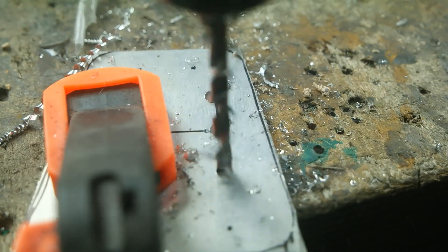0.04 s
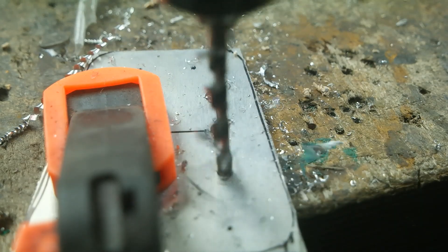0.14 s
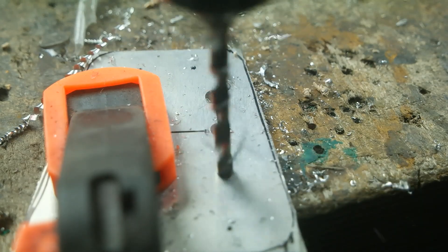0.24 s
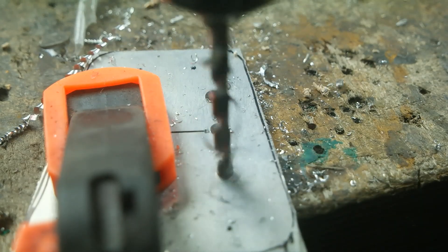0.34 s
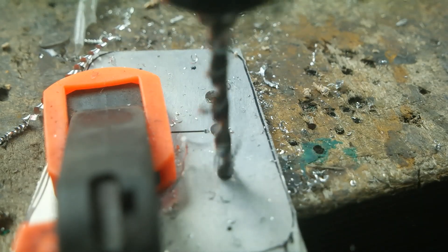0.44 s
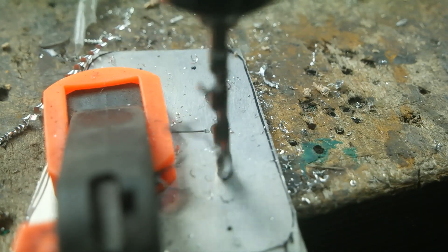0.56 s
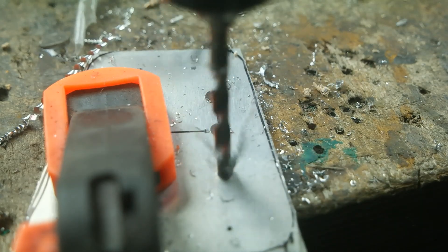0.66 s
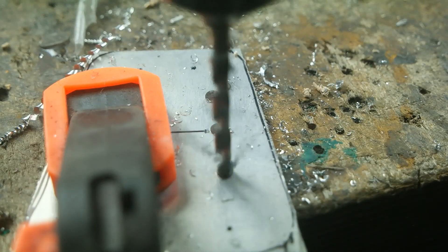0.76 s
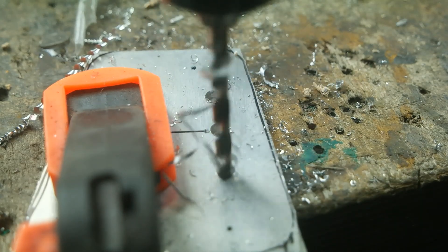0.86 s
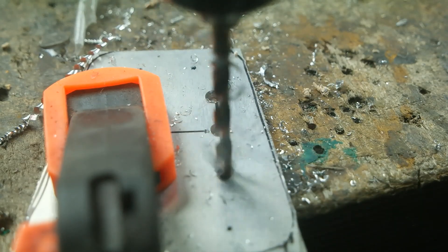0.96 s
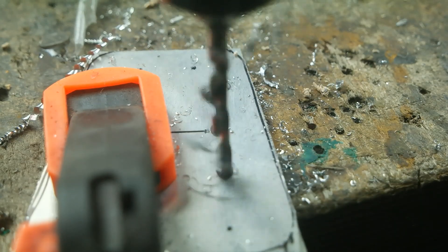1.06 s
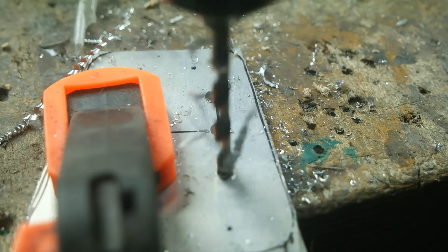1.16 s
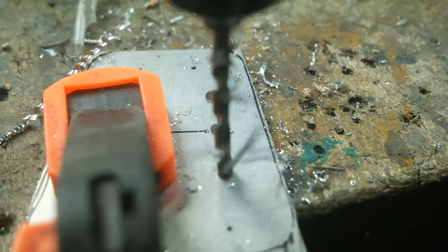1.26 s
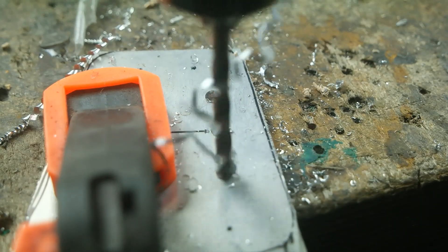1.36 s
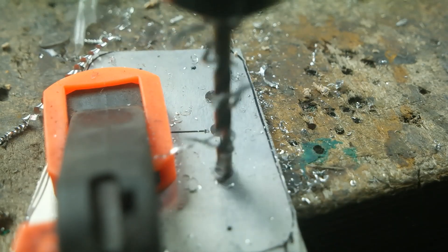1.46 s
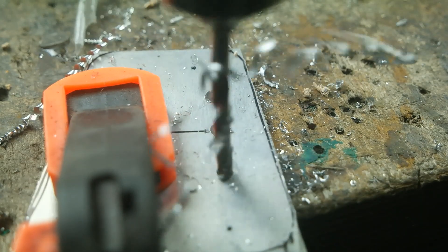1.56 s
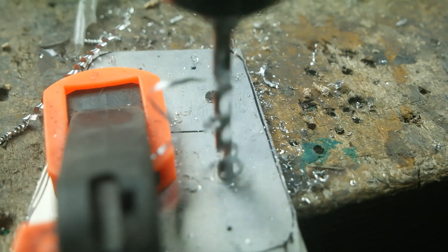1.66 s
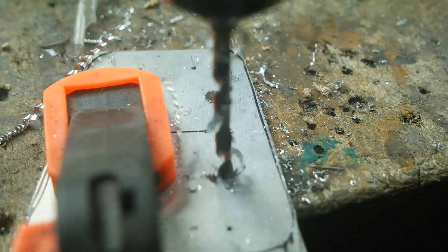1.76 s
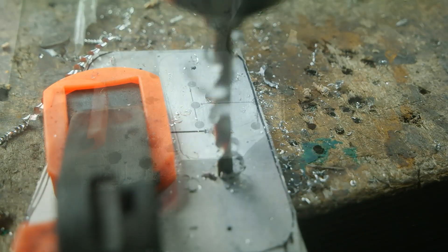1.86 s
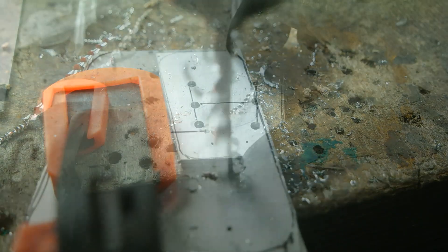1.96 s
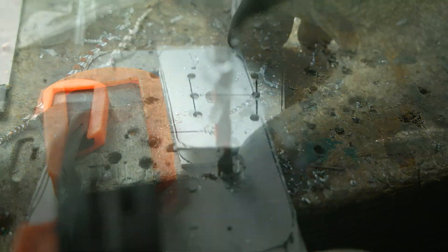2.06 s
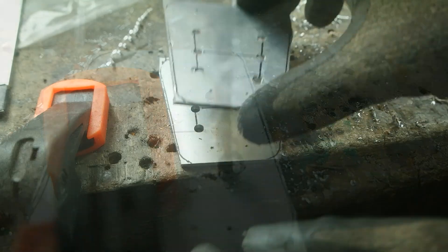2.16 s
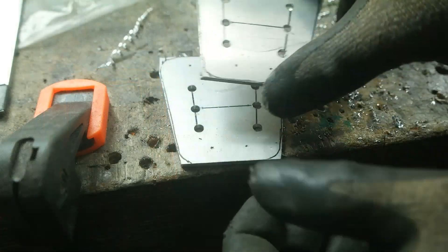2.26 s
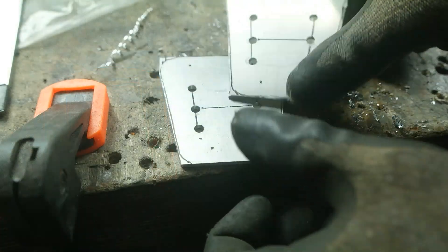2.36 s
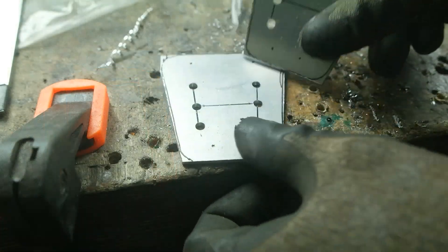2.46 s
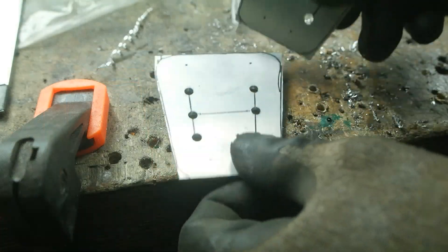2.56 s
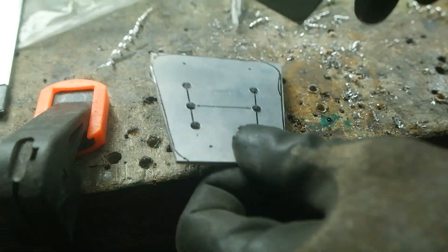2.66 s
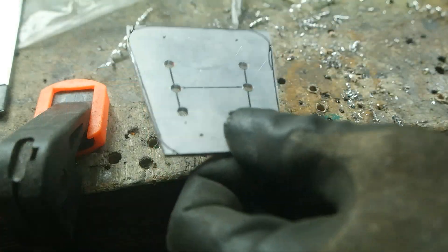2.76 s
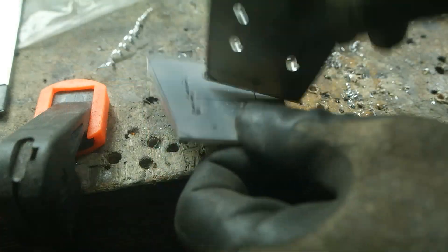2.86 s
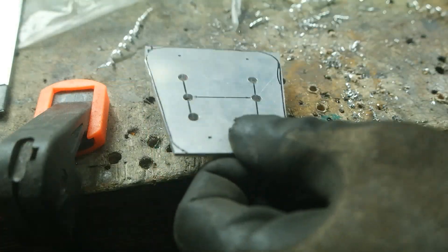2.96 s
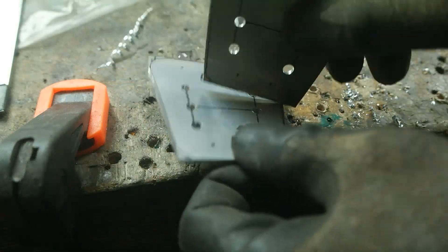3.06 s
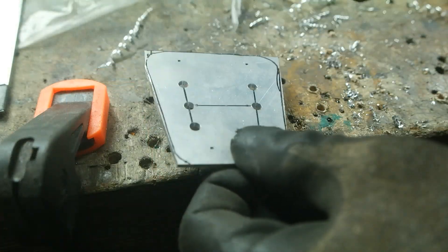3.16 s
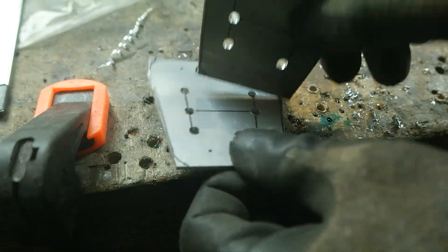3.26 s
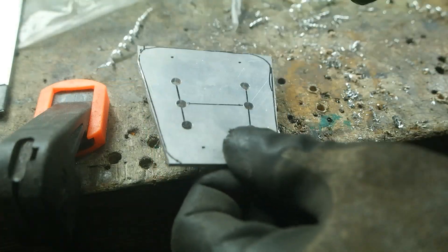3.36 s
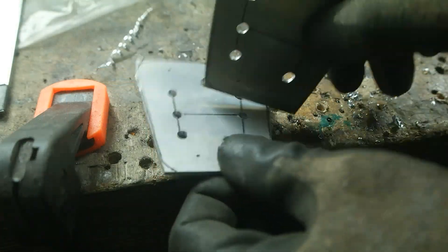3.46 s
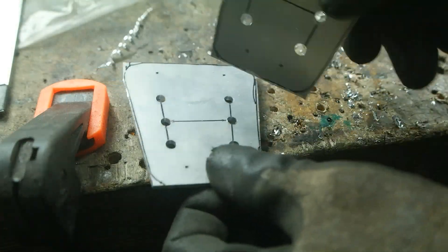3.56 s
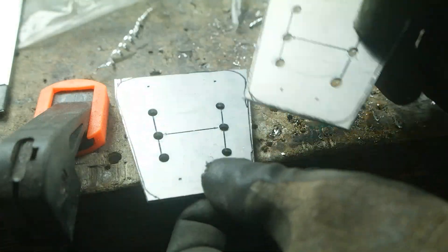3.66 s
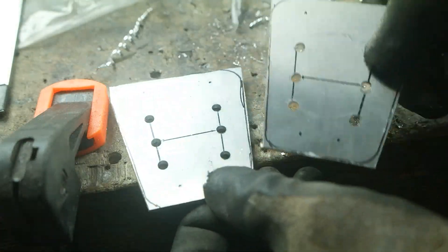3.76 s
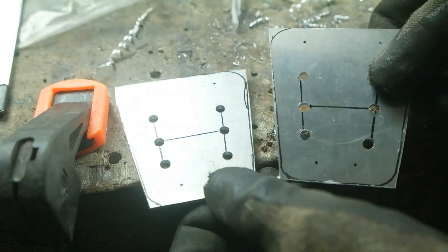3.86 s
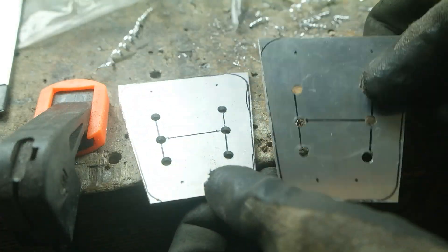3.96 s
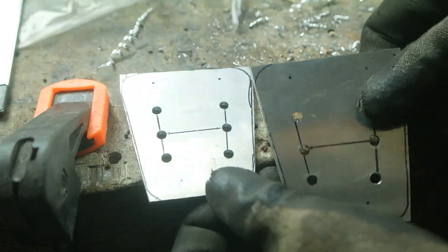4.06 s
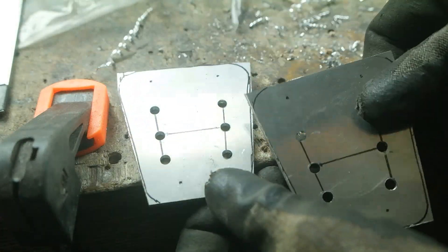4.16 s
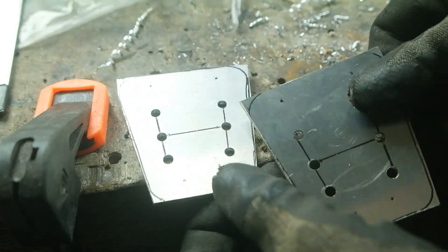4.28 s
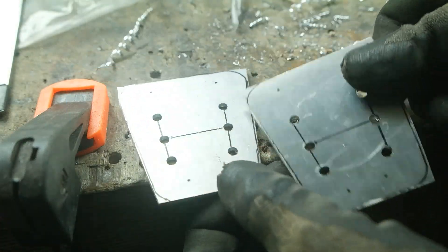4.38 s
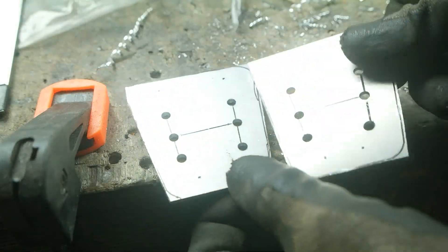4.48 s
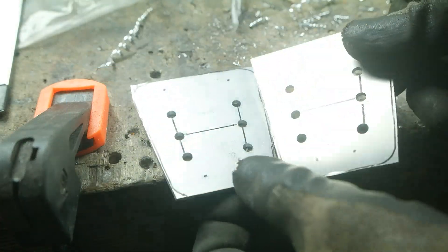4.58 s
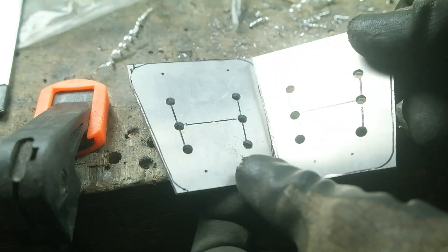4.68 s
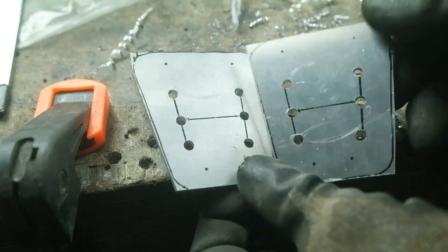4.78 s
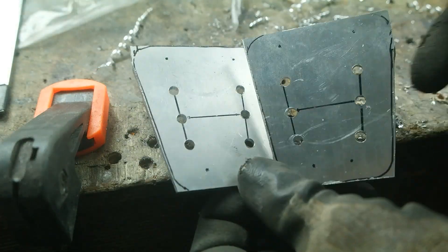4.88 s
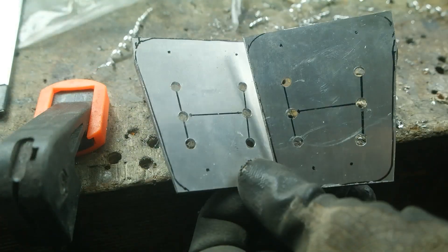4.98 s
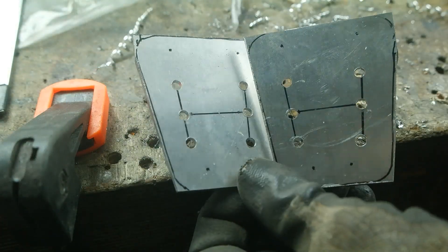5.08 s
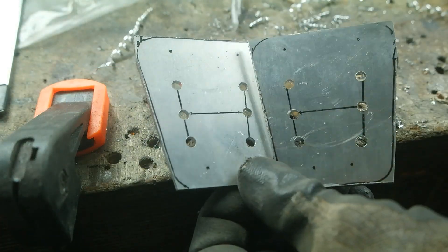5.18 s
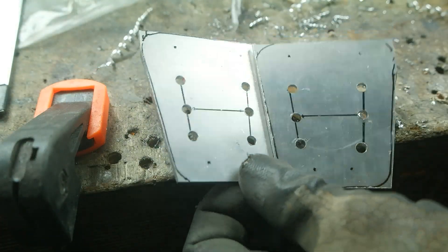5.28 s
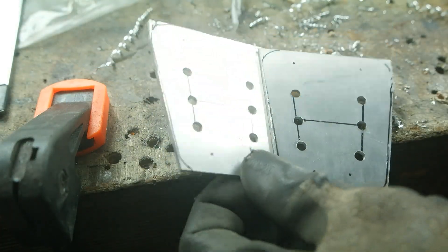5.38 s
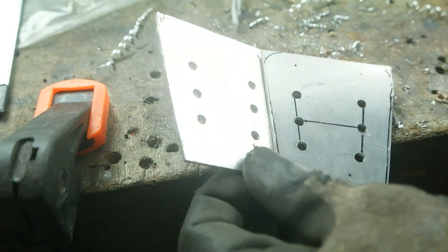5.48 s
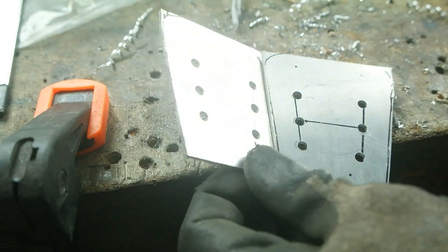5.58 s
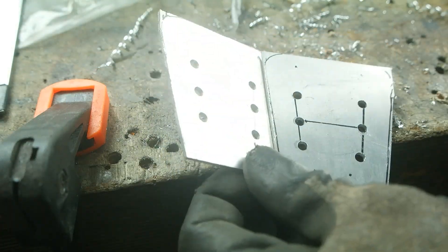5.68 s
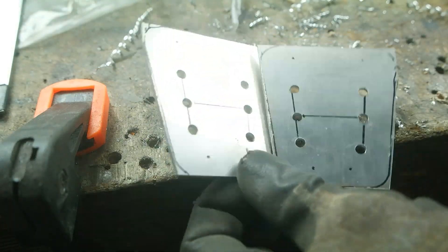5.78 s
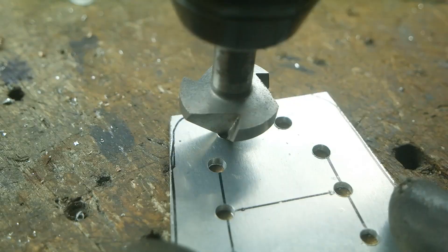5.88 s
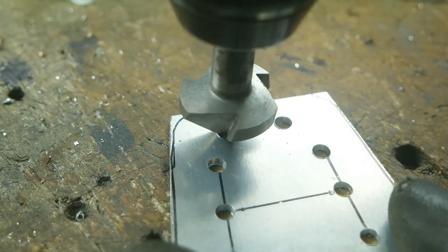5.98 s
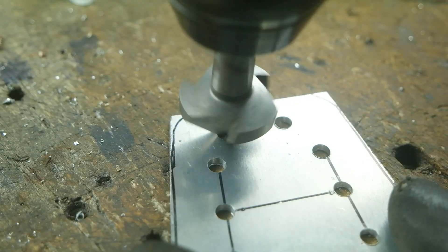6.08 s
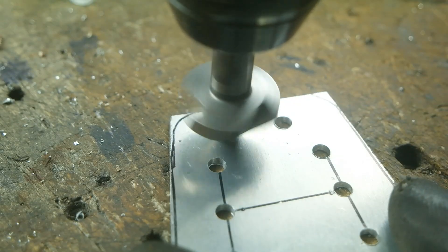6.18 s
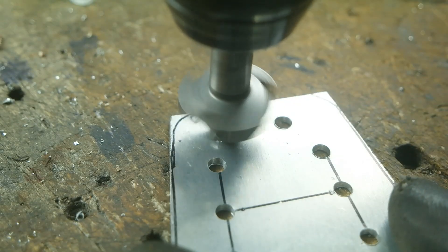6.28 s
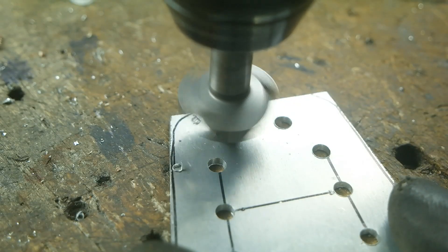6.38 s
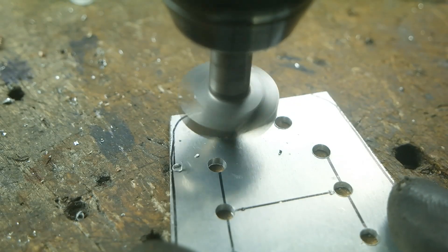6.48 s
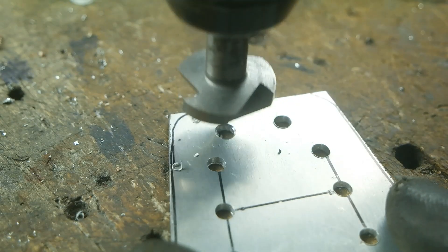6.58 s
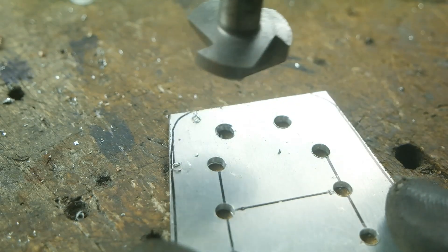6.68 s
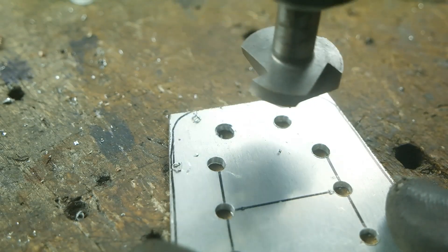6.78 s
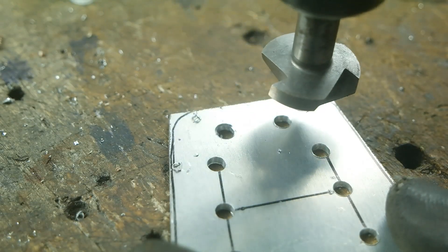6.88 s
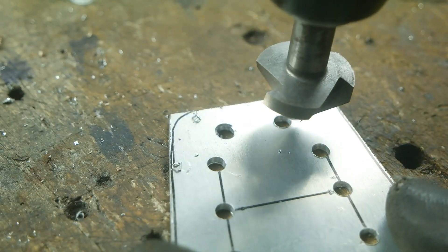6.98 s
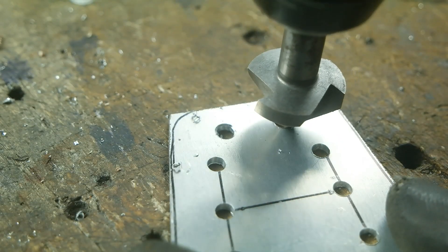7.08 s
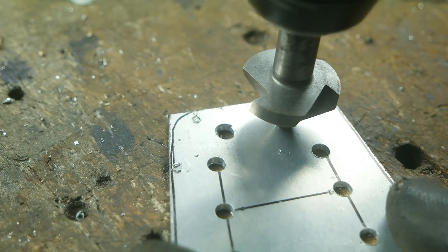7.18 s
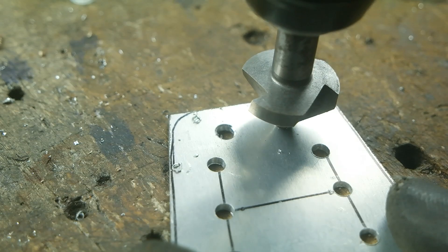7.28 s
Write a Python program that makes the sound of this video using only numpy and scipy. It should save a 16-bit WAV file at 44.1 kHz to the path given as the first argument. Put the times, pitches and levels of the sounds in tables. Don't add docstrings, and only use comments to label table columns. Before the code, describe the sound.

Drill whine and throbbing metallic hiss fill the first two seconds, then cut off. Thin plates rattle, ping and scrape close to the microphone, the loudest knocks distorting. Quiet handling and low room noise follow. Lastly, a countersink drill ticks against metal, is triggered with a snap, surges in two quick overlapping rises, stops with sharp clicks, and ends in a short fading room echo, light taps and a low hum.

```python
import sys
import numpy as np
from scipy import signal
from scipy.fft import rfft, irfft, next_fast_len
from scipy.io import wavfile
from scipy.ndimage import uniform_filter1d

SR = 44100
rng = np.random.default_rng(int(sys.argv[2]) if len(sys.argv) > 2 else 0)


def waveform_to_disk(signal):
    frames = np.transpose(np.atleast_2d(signal))
    scaled = np.clip(frames, -1, 1) * 32767
    samples = np.round(scaled).astype(np.int16)
    wavfile.write(sys.argv[1], SR, samples)


def attenuation_scalar(level_db):
    decades = np.asarray(level_db, float) / 20
    return 10 ** decades


N = 323694
TIME = np.arange(N) / SR

# pitch in Hz, width in Hz while rubbed, level in dB, change when gripped in dB.
PLATE = [(2050, 47, -26, 0.5), (2945, 74, 19.5, -1), (3810, 78, -7.5, -4), (4200, 90, -19.5, 1.5),
         (4960, 130, -10, 1.5), (5450, 110, -5.5, -4), (7460, 90, -17, 3), (7620, 150, -13, 5),
         (6990, 60, -19.5, 4), (10050, 150, -22.5, 6), (10886, 80, -9, -6), (11930, 110, -12, -3),
         (12000, 120, -14.5, -3.5), (14300, 230, -12, 0.5)]
RUB_RISE = 8100
WHINE_RISE = 920


def evened(x):
    return x / np.sqrt(np.mean(x ** 2) + 1e-20)


def read(points, hz):
    f, value = np.transpose(points)
    return np.interp(np.log(hz + 1), np.log(f + 1), value)


def curve(rows, order):
    rows = np.array(rows)
    return np.interp(TIME, rows[:, 0], rows[:, order])


def level(rows, order):
    inside = (TIME >= rows[0][0]) & (TIME <= rows[-1][0])
    return attenuation_scalar(curve(rows, order=order)) * uniform_filter1d(inside * 1., size=100)


def swells(rows, rise):
    start, hold, db, fall = np.array(rows, float).T[:4, :, None]
    rise = np.reshape(rise, (-1, 1))
    early = np.maximum(start - TIME, 0)
    late = np.maximum(TIME - start - hold, 0)
    return attenuation_scalar(np.max(db - rise * early - abs(fall) * late, axis=0))


def during(spans):
    return sum((TIME > s) & (TIME < s + length) for s, length in spans) * 1.


def add(mix, s, sound):
    part = mix[round(s * SR):][:len(sound)]
    part += sound[:len(part)]


def resonate(x, hz, width):
    turn = np.exp(2j * np.pi * np.cumsum(hz * np.ones(len(x))) / SR)
    r = np.exp(-np.pi * width / SR)
    return 2 * (turn * signal.lfilter([1 - r], [1, -r], x / turn + 1e-18)).real


def noise(colour, patchy_db, lo_hz, hi_hz, apart):
    # pitch in Hz, likeness of left and right from 0 to 1.
    likeness = [(60, 0.32), (180, 0.95), (550, 0.88), (1650, 0.84), (4970, 0.39), (15000, 0.17)]
    frames, hz = N // 256 + 5, np.fft.rfftfreq(1024, 1 / SR)
    a, b, c, d, patches = rng.standard_normal((frames, 513, 5)).T
    patches = evened(uniform_filter1d(uniform_filter1d(patches, size=10, axis=0), size=5, axis=1))
    same = np.clip(1 - apart * (1 - read(likeness, hz)), -1, 1)[:, None]
    left = a + 1j * b
    right = same * left + np.sqrt(1 - same ** 2) * (c + 1j * d)
    shape = attenuation_scalar(read(colour, hz))
    z = np.array([left, right]) * shape[:, None] * attenuation_scalar(patchy_db * patches)
    share = np.sum(shape[(hz > lo_hz) & (hz < hi_hz)] ** 2) / np.sum(shape ** 2)
    return evened(signal.istft(z, nperseg=1024, noverlap=768)[1][:, :N]) / np.sqrt(share)


def whine(hz, orders, dbs, waver_hz, flutter_db, pace=150, shell=((1, 0), (2, 0))):
    out, knots = np.zeros(N), np.arange(1500) / max(pace, 5)
    for k, db in zip(orders, dbs):
        waver, flutter = (np.interp(TIME, knots, v) for v in rng.standard_normal((2, 1500)))
        gain = attenuation_scalar(db + flutter_db * flutter + read(shell, k * hz)) * np.sqrt(2)
        out += gain * np.cos(2 * np.pi * np.cumsum(k * hz + waver_hz * waver) / SR)
    return out


def spread(x, wide_db):
    # pitch in Hz, side against middle in dB.
    side_colour = [(60, -10), (180, -20.5), (550, -12.5), (1650, -20.5), (3300, -8), (5500, -2.5),
                   (15000, -3)]
    hz = np.fft.rfftfreq(1024, 1 / SR)
    taps = rng.standard_normal(1024) * np.exp(-np.arange(1024) / 400.0)
    side = irfft(rfft(taps / np.linalg.norm(taps)) * attenuation_scalar(read(side_colour, hz) + wide_db))[:600]
    return x + np.array([[1], [-1]]) * signal.oaconvolve(x, side)[:N]


def panned(x, left_db):
    return x * attenuation_scalar([[left_db / 2], [-left_db / 2]])


def dulled(x, from_s, above_hz, fall_db_per_s):
    low = signal.lfilter(*signal.butter(2, above_hz, fs=SR), x)
    return low + (x - low) * attenuation_scalar(-fall_db_per_s * np.maximum(TIME - from_s, 0))


def boring():
    # time in seconds, turns of the spindle gear in Hz.
    speed = [(0, 53.9), (.1, 53.75), (.7, 53.78), (.9, 53.55), (1.1, 53.1), (1.3, 52.4), (1.5, 51.7),
             (1.7, 50.6), (2.04, 47)]
    # time in seconds, cutting hiss in dB.
    push = [(0, -21), (1.74, -21), (1.83, -26), (1.87, -44), (2.05, -55)]
    gear_orders = [12, 16, 23.198, 24, 35.23, 36, 40, 42, 45, 47.2, 50.35, 54.7, 59.3, 64, 67, 72, 80, 90,
                   98.2, 103]
    gear_dbs = [-39, -52, -39, -37.5, -36, -39, -45, -46.5, -36, -38.5, -51, -49, -39.5, -58.5, -54, -36,
                -41.5, -37, -52.5, -50]
    shaft_dbs = [-48, -49, -43, -48]
    # pitch in Hz, level in dB per Hz.
    cut_colour = [(530, -20.5), (900, -6.5), (1150, -10.5), (1260, -0.5), (1620, -6), (1900, 2.5),
                  (2270, -2), (2730, 3), (4050, -3.5), (5890, -3.5), (10100, -10.5), (15100, -8),
                  (16000, -33)]
    housing_colour = [(35, -78.5), (60, -57), (233, 10), (442, 3.5), (574, 8.5), (699, 6.5), (823, 4.5),
                      (3000, -18), (3900, -26), (6600, -120)]
    stop_s, chuck_ratio = 2.045, .2673

    hz = curve(speed, order=1)
    turns = np.cumsum(hz) / SR
    throb = 1 + .1 * np.cos(2 * np.pi * 3 * turns) + .08 * np.cos(2 * np.pi * 4 * turns)
    hiss = noise(cut_colour, 0.27, 1500, 13000, apart=0.86) * throb
    hiss = signal.lfilter(*signal.butter(1, 150, "high", fs=SR), hiss)
    gears = whine(hz, gear_orders, gear_dbs, waver_hz=1.2, flutter_db=1.2, pace=40)
    cut = hiss + attenuation_scalar(21.0) * spread(gears, wide_db=3.0)
    wobble = .4 * np.cos(2 * np.pi * (chuck_ratio * turns - .18))
    cut = cut + wobble * np.array([resonate(v, 1270, 120) + resonate(v, 1950, 270) for v in cut])
    chatter = .3 * np.cos(2 * np.pi * 3 * chuck_ratio * turns)
    cut = cut + chatter * np.array([resonate(v, 2750, 830) for v in cut])

    shaft = whine(hz, range(3, 7), shaft_dbs, waver_hz=.8, flutter_db=2., pace=20)
    housing = attenuation_scalar(-7.0) * noise(housing_colour, 0.66, 120, 1100, apart=0.53) + attenuation_scalar(28) * shaft
    effort_db = curve(push, order=1)
    housing_db = -28.5 + 0.29 * (effort_db - push[0][1])
    both = attenuation_scalar(effort_db) * dulled(cut, 1.7, 8560, 37) + attenuation_scalar(housing_db) * housing
    return both * np.clip((stop_s - TIME) / 0.0039, 0, 1)


def knocks():
    # time in seconds, peak in dB, middle modes in dB, upper modes in dB.
    knock_list = [(2.425, -23.5, -1.5, -9.5), (2.4228, -10.5, 2, -6.5), (2.4265, -13.5, 1, 5.5),
                  (2.445, -15, 0.5, 2), (2.448, -14, 0, 4), (2.4648, -11.5, -8, -9.5),
                  (2.481, -16, -9.5, -13), (2.4936, -17, 0, -1), (2.497, -11, -2, -4),
                  (2.5083, -15, -6.5, -4.5), (2.523, -17.5, -7.5, -1.5), (2.536, -24, -9.5, -7),
                  (2.6625, -10.5, 12.5, -4), (2.6664, -14.5, 12.5, -0.5), (2.9175, 11, -15.5, -16.5),
                  (2.924, -3.5, -2, -2.5), (2.9272, -9.5, 0, 2), (2.933, -17, -12.5, -11),
                  (3.0971, 8.5, -19.5, -16), (3.1, -4, -2.5, 1), (3.1041, -10, -4, -2),
                  (3.107, -16.5, 4.5, 3), (3.291, 7, -14, -26), (3.2969, -2, -6, -3.5),
                  (3.2998, -12.5, 2, 0), (3.4875, 5, -6.5, -16), (3.4904, -4.5, 1, 4.5),
                  (3.4953, -16, -2, 4), (4.05, -53, 9, 6.5), (4.062, -53, 8.5, -1), (4.4326, -50, -14, 4),
                  (4.4594, -59, 3.5, 0.5), (4.492, -35.5, -8, -13), (4.559, -36.5, -10, -5),
                  (4.629, -45.5, 5, 0), (4.6655, -35.5, -8, -16), (4.699, -41, -11.5, -10),
                  (4.8223, -51, -4, -8)]
    # start in seconds, length in seconds.
    pinches = [(2.64, .1), (2.932, .1), (3.107, .1), (3.292, .6)]
    contact_s, ring_contact_s = 0.0024, .0004
    contact = np.zeros((5, N))
    t = np.arange(2000) / SR
    for (s, peak_db, mid_db, top_db), shake in zip(knock_list, rng.standard_normal((len(knock_list), 2000))):
        push = np.exp(-t / contact_s) * shake
        push[0] = np.clip(-5 - .45 * peak_db, 1, 8)
        push /= np.linalg.norm(push)
        thud_db = -21 - .5 * peak_db
        for row, db in enumerate((0, mid_db, top_db, thud_db)):
            add(contact[row], s, attenuation_scalar(peak_db + db) * push)
        blow = t * np.exp(-t / ring_contact_s) * np.sin(2 * np.pi * PLATE[1][0] * t)
        add(contact[4], s, attenuation_scalar(peak_db - 16.0) * blow / np.linalg.norm(blow))

    out = np.zeros(N)
    pinched = uniform_filter1d(during(pinches), size=400)
    for hz, _, db, _ in PLATE:
        group = int(hz > 3500) + int(hz > 6800)
        free = 12 + .012 * hz
        struck = resonate(contact[group or 4], hz, free * (1 + min(group, 1)))
        if not group:
            short = resonate(contact[4], hz, 2.5 * free) / 2.5
            struck += pinched * (short - struck)
        out += attenuation_scalar(.5 * db + 29.5) * struck

    s, peak_db = np.transpose(knock_list)[:2]
    whole, middle, upper, thud, _ = contact * attenuation_scalar(.3 * np.maximum(np.interp(TIME, s, peak_db), -22))
    out += attenuation_scalar(22.0) * resonate(resonate(whole, 2700, 1300), 2450, 1300)
    out += attenuation_scalar(15.0) * resonate(middle, 4800, 1500)
    out += attenuation_scalar(-11.5) * resonate(upper, 11000, 8000)
    return out + attenuation_scalar(12.0) * resonate(resonate(thud, 780, 1200), 780, 1200)


def rubbing():
    # start in seconds, hold in seconds, main ring in dB, upper modes in dB, fall in dB per second.
    strokes = [(2.216, .02, -91, -75, 148.5), (2.312, .03, -77, -69, 98), (2.346, .045, -67, -60.5, 98),
               (2.4, 0.017, -57.5, -44.5, 687.5), (2.445, 0.0068, -26, -24, 500),
               (2.46, 0.0063, -28, -22, 405.5), (2.475, 0.011, -27.5, -23.5, 300),
               (2.49, 0.018, -19.5, -16.5, 324), (2.546, 0.061, -52, -41, 83.5),
               (2.693, 0.0089, -45, -36.5, 124.5), (2.946, 0.13, -23.5, -31.5, 296),
               (3.112, 0.15, -27, -32.5, 302), (3.319, 0.14, -29, -34, 196), (3.501, 0.13, -26.5, -31, 101),
               (4.037, 0.017, -59, -56.5, 246), (4.099, 0.52, -77, -62.5, 79.5),
               (4.648, .05, -78, -63, 103), (4.74, 0.08, -75.5, -62.5, 121.5)]
    # start in seconds, length in seconds.
    grips = [(2.428, 0.26), (3.298, 0.76)]
    # pitch in Hz, width in Hz, level in dB.
    grit_bands = [(1184, 1100, -9.5), (2420, 1300, 0.5), (4582, 1800, 3), (8300, 1700, 0.5),
                  (9600, 2200, -4), (11600, 2600, -5.5), (14400, 1700, -5.5)]
    # start in seconds, hold in seconds, level in dB, fall in dB per second.
    squeaks = [(4.31, 0.038, -61.5, 197), (4.495, 0.052, -56, 698.5), (4.612, 0.02, -62, 701),
               (1.7, 0.0607, -67.5, 298)]
    scrapes = [(2.446, .012, -26, 300), (2.47, .02, -31.5, 294), (2.497, .03, -33.5, 200),
               (2.53, .008, -33, 148)]
    burrs_per_s = 3000
    slide, slide_db, slide_pace = .012, 3, 14

    grain_db = 5.5 * np.minimum(rng.exponential(1, N), 4)
    grit = attenuation_scalar(grain_db) * rng.standard_normal(N)
    ring, knots = np.zeros((2, N)), np.arange(200) / slide_pace
    grip = uniform_filter1d(during(grips) * .9, size=1500)
    for (hz, width, db, gripped_db), slides in zip(PLATE, rng.standard_normal((len(PLATE), 2, 200))):
        high = int(hz > 3500)
        free = 12 + .012 * hz
        width = max(width, 2 * free) if high else free
        shift, mute = (high * np.interp(TIME, knots, v) for v in slides)
        hz = hz * (1 + slide * shift)
        rung = resonate(resonate(grit, hz, width), hz, 6 * width)
        ring[high] += attenuation_scalar(db + gripped_db * grip + slide_db * mute) * rung

    damped = evened(resonate(resonate(grit, 2990, 300), 3500, 1600))
    main = (1 - grip) * evened(ring[0]) + 0.66 * grip * damped
    main += 0.16 * evened(resonate(resonate(grit[::-1], 2110, 450), 2110, 600))
    direct = sum(attenuation_scalar(db) * resonate(resonate(grit, f, w), f, w) for f, w, db in grit_bands)
    upper = evened(ring[1]) + evened(direct)
    main_gain = swells([row[:3] + row[4:] for row in strokes], RUB_RISE)
    upper_gain = swells([(a, b, db, fall) for a, b, _, db, fall in strokes], RUB_RISE)
    rub = main_gain * evened(main) + attenuation_scalar(-0.5) * upper_gain * evened(upper)

    rub = rub + swells(squeaks, 500) * evened(resonate(resonate(grit, 5540, 170), 5540, 400))
    burrs = np.tanh(grit / 4) * (rng.random(N) < burrs_per_s / SR)
    catch = resonate(resonate(burrs, 950, 1100), 950, 1500) + .1 * resonate(burrs, 5000, 3000)
    rub = rub + swells(scrapes, RUB_RISE) * evened(catch)
    return signal.sosfilt(signal.ellip(8, .5, 60, 14900, fs=SR, output="sos"), rub)


def plates():
    # start in seconds, hold in seconds, level in dB, fall in dB per second.
    presses = [(2.43, 0.063, -43, 300), (2.5, 0.21, -41, 68), (2.93, 0.6, -41, 57), (3.3, 0.31, -38.5, 68),
               (4.1, 0.27, -66, 42), (4.495, 0.013, -57.5, 303.5), (4.39, .015, -60, 300),
               (4.675, 0.024, -51, 198.5), (4.75, .1, -75.5, 42)]
    # pitch in Hz, level in dB per Hz.
    bench_colour = [(24, -70.5), (40, -54), (246, -3.5), (390, 0.5), (629, 0), (762, -7), (1440, -37),
                    (1800, -13), (2340, -40.5), (3960, -120)]
    steel = knocks() + rubbing()
    near = spread(steel, wide_db=1.5)
    near = near + np.array([[-.1], [.1]]) * resonate(steel, 3400, 900)
    return near + swells(presses, 660) * noise(bench_colour, 0.3, 250, 800, apart=0.89)


def countersink():
    # time in seconds, commutator pulses in Hz. Then its multiples in dB.
    start_speed = [(6.07, 640), (6.1, 760), (6.12, 797), (6.14, 843), (6.16, 872), (6.18, 915), (6.2, 943),
                   (6.25, 1020)]
    start_dbs = [-16, -8, -1.5, 0.5, 0, 0.5, -3, -2, -5]
    # time in seconds, gear mesh in Hz. Then its multiples and their dB.
    mesh_speed = [(6.19, 760), (6.228, 2000), (6.25, 2300), (6.3, 2840), (6.35, 3080), (6.42, 3266),
                  (6.5, 3392), (6.57, 3455), (6.6, 3250)]
    mesh_orders = [.266, .446, .8, 1, 1.32, 1.57, 1.603, 1.785, 2, 2.2, 2.672, 3.1, 3.198]
    mesh_dbs = [-10, 5, -1.5, 2, 0, 2, 5, -3, 2, -3, 5.5, 4, 1]
    # pitch in Hz, level in dB.
    shell = [(400, -3), (1200, -3), (1520, -6), (2300, 1.5), (2750, 3), (3400, 3), (4000, 0.), (4500, 4),
             (5000, 0.), (5400, 3), (6500, 3), (7600, -1), (9000, 0.), (11500, -1)]
    sweep_shell = [(2000, -16), (2500, -2), (3200, 3), (3800, -4), (4450, 3), (4800, -3), (5200, 1),
                   (5600, -3) , (6050, 4), (6500, 3), (7200, -8)]
    # start in seconds, hold in seconds, level in dB, fall in dB per second.
    start_swell = [(6.085, 0.13, -27, 507)]
    mesh_swell = [(6.2, .37, -36, 696)]
    sweep_swell = [(6.197, 0.081, -21.5, 492), (6.3, 0.268, -42.5, 700)]
    chopper_swell = [(6.06, 0.057, -27, 55.3)]
    roar_swell = [(6.058, 0.21, -31.5, 59), (6.3, 0.31, -37, 897.5), (6.62, 0.077, -47.5, 93)]
    coast_swell = [(6.68, 0.058, -53, 124)]
    # the same four, then pitch in Hz.
    rests = [(5.865, 0.12, -51.5, 293.5, 193), (7.144, 0.016, -34, 80.5, 182)]
    # time in seconds, hiss in dB.
    effort = [(6.034, -38.5), (6.058, -30.5), (6.085, -20), (6.194, -15), (6.28, -13), (6.316, -17.5),
              (6.608, -19), (6.62, -35), (6.95, -61)]
    # pitch in Hz, level in dB per Hz.
    hiss_colour = [(710, -48), (1200, -15), (1610, -20), (2590, 1.5), (3830, 2), (4410, 3.5), (7100, 4),
                   (8350, -0.5), (10400, 0), (15200, -6.5), (16000, -15.5)]
    roar_colour = [(24, -42), (40, -41), (210, -7.5), (331, -11.5), (405, -12.5), (1070, -2), (1630, -8.5),
                   (2200, -2), (2860, -7), (4840, -120)]
    brake_s, chopper_hz = 6.6, 5390

    pulses = whine(curve(start_speed, order=1), range(1, 10), start_dbs,
                   waver_hz=7.7, flutter_db=4., pace=100, shell=shell)
    tones = swells(start_swell, WHINE_RISE) * pulses
    mesh_hz = curve(mesh_speed, order=1)
    mesh = whine(mesh_hz, mesh_orders, mesh_dbs, waver_hz=6.5, flutter_db=2., pace=60, shell=shell)
    tones += swells(mesh_swell, WHINE_RISE) * mesh
    sweep = whine(mesh_hz, [1, 2, 3], [-3, -3, 1], waver_hz=14., flutter_db=2.5, pace=90, shell=sweep_shell)
    tones += swells(sweep_swell, WHINE_RISE) * sweep
    powered = (TIME > effort[0][0]) * (TIME < brake_s)
    chopper = whine(chopper_hz, [1], [0], waver_hz=2.4, flutter_db=0.0)
    tones += swells(chopper_swell, WHINE_RISE) * powered * chopper
    for row in rests:
        hum = resonate(rng.standard_normal(N), row[4], 56)
        tones += attenuation_scalar(-9.5) * swells([row], 5 * WHINE_RISE) * evened(resonate(hum, row[4], 160))

    hiss = level(effort, order=1) * noise(hiss_colour, 1.4, 2000, 12000, apart=0.54)
    hiss = dulled(hiss, 6.62, 5800, 66)
    roar = noise(roar_colour, 1.5, 300, 1500, apart=.95)
    coast = evened(resonate(resonate(roar[0], 1010, 328), 1300, 485))
    coast = coast + .9 * evened(resonate(np.diff(roar[1], prepend=0), 3100, 2000))
    tones += swells(coast_swell, 295.7) * coast
    return spread(tones, wide_db=-7.0) + hiss + swells(roar_swell, WHINE_RISE) * roar


def clicks():
    # time in seconds, peak in dB, centre in Hz, bright spray in dB.
    click_list = [(2.0221, -34.5, 2104, -22), (2.1368, -55, 2130, -18), (5.119, -48, 900, -21),
                  (5.167, -39, 2590, -24), (5.8653, -33.5, 2940, -16.5), (5.87, -35, 3300, -5),
                  (5.9248, -33, 2840, -2), (5.9593, -28, 2750, -15), (6.0368, -19, 4580, -6.5),
                  (6.0443, -20, 2600, 4), (6.0562, -8, 2390, -15), (6.0555, -0.5, 4530, -15.5),
                  (6.179, -9, 4600, -23), (6.204, -2.5, 6700, -19), (6.5932, -9, 4220, -0.5),
                  (6.602, -4, 3510, 7), (6.6075, -4, 2540, 0), (6.629, -29.5, 4500, -9),
                  (6.6379, -21, 4230, -20), (7.14, -35, 2890, -10.5), (7.1455, -34.5, 5000, -12.5),
                  (7.1542, -29, 2520, 2), (7.156, -31.5, 2590, -1), (7.1628, -31, 2700, -15),
                  (7.1908, -29, 4500, -20), (7.252, -35.5, 5000, -7.5), (7.2571, -26, 2740, -25.5),
                  (7.266, -32, 4900, -13.5)]
    out, t = np.zeros(N), np.arange(1500) / SR
    for (s, peak_db, hz, spray_db), shake in zip(click_list, rng.standard_normal((len(click_list), 1500))):
        burst = shake * np.exp(-t / 0.002) * np.minimum(t / 0.0019, 1)
        burst = 5.4 * resonate(burst, hz, 810) + attenuation_scalar(spray_db + 4.0) * resonate(burst, 8000, 7000)
        add(out, s, attenuation_scalar(peak_db - 1.5) * burst / abs(burst).max())
    return spread(out, wide_db=-2.5)


def workshop_air():
    # start in seconds, hold in seconds, level in dB, fall in dB per second, rise in dB per second.
    lifts = [(2.561, .17, -49.5, 97, 141), (3.298, 0.44, -56, 46, 41), (4.16, 0.58, -66, 28.5, 65),
             (5.285, 0.083, -68.5, 26.5, 52), (5.867, .16, -66.5, 51, 2000.5),
             (6.192, 0.038, -55.5, 49.5, 113), (6.751, 0.027, -61.5, 48.5, 54),
             (7.149, 0.11, -61.5, 49, 2000.5)]
    # pitch in Hz, level in dB per Hz.
    air_colour = [(18, -43), (30, -24), (245, -5.5), (554, -4), (1910, -10.5), (3200, -12), (15200, -27),
                  (16300, -18)]
    rumble = attenuation_scalar(-10.5) * evened(np.array([resonate(v, 70, 90) for v in rng.standard_normal((2, N))]))
    lift = np.maximum(swells(lifts, [row[4] for row in lifts]), attenuation_scalar(-80.5))
    bright = attenuation_scalar(5) * np.minimum(lift, attenuation_scalar(-67.5)) * np.diff(rng.standard_normal((2, N + 1)))
    return bright + lift * (noise(air_colour, 1.5, 1200, 1700, apart=1.3) + rumble)


def scene():
    near = panned(boring(), .3) + panned(plates(), -2.7)
    near = near + panned(countersink(), -1.6) + panned(clicks(), -.4)
    near = signal.lfilter(*signal.butter(2, 130, "high", fs=SR), near)
    return near + panned(workshop_air(), -0.68)


def top_cut(x):
    return signal.sosfilt(signal.butter(12, 16570, fs=SR, output="sos"), x)


def record(dry):
    # pitch in Hz, left minus right in dB.
    lean = [(60, -3), (240, 0), (950, 0), (3770, 0), (15000, 2)]
    size = next_fast_len(N)
    dry = dry + attenuation_scalar(-80.0) * np.diff(rng.standard_normal((2, N + 1)))
    lean_db = read(lean, np.fft.rfftfreq(size, 1 / SR))
    x = irfft(rfft(dry, size) * attenuation_scalar(np.array([[.5], [-.5]]) * lean_db), size)[:, :N]
    x = signal.sosfilt(signal.ellip(8, .3, 60, 15950, fs=SR, output="sos"), x)
    x = np.clip(x + .02 * x ** 2, -1, 1)
    x = signal.lfilter(*signal.butter(5, 16800, fs=SR), x)
    return top_cut(x)


dry = scene()
out = record(dry)
waveform_to_disk(out)
```